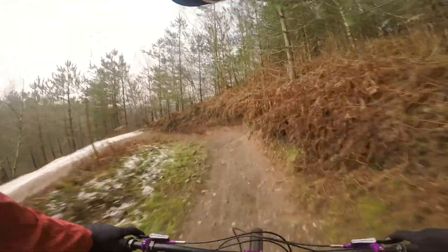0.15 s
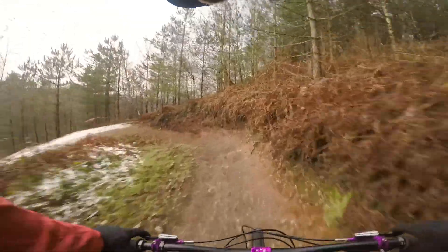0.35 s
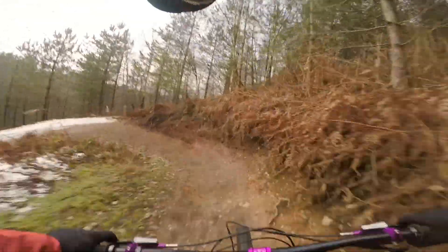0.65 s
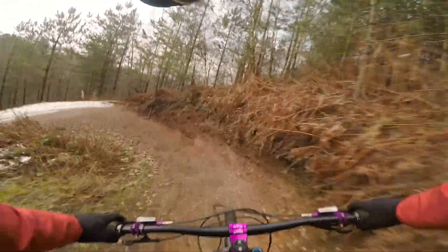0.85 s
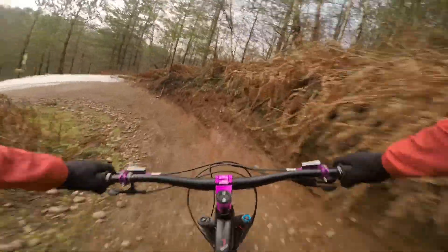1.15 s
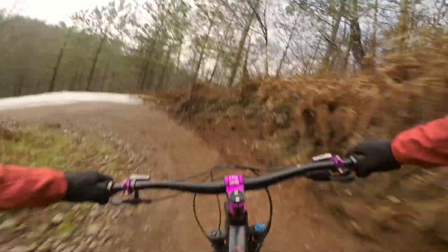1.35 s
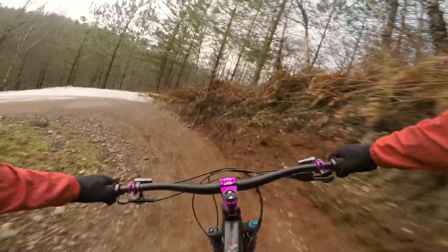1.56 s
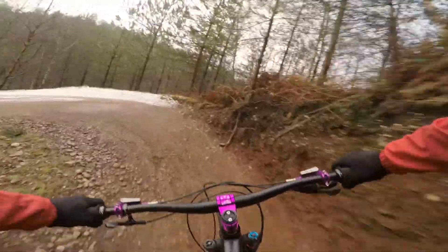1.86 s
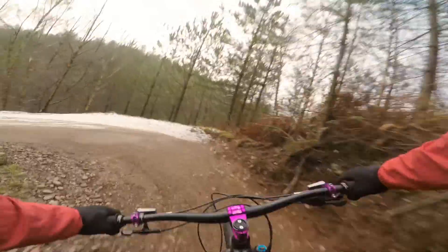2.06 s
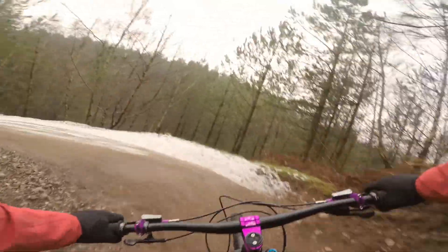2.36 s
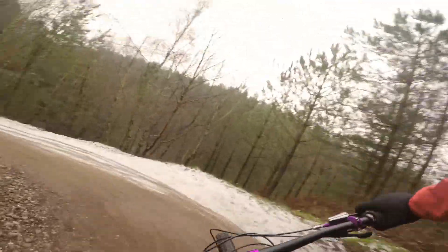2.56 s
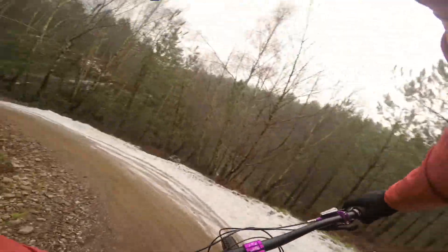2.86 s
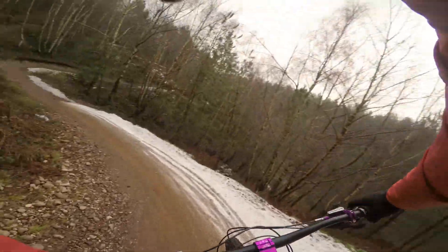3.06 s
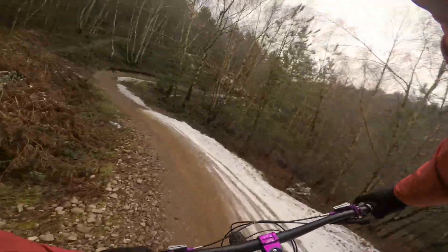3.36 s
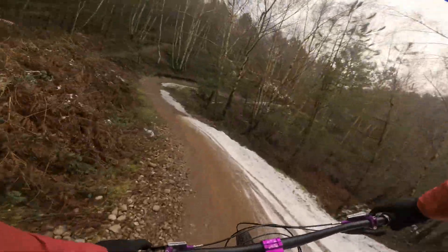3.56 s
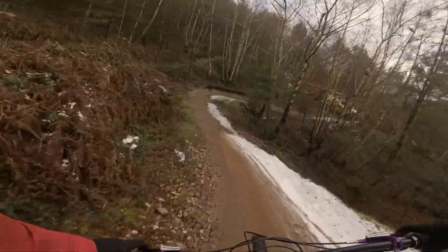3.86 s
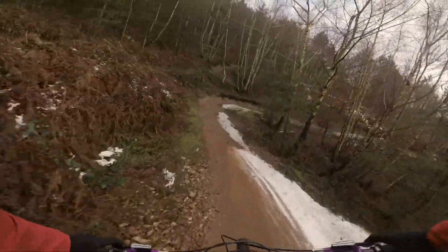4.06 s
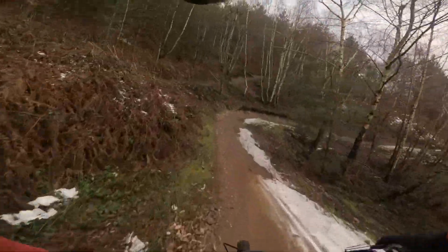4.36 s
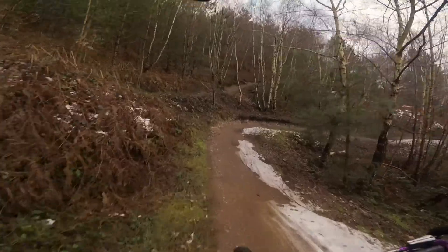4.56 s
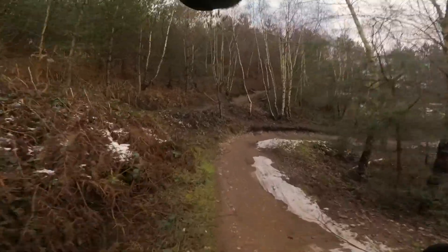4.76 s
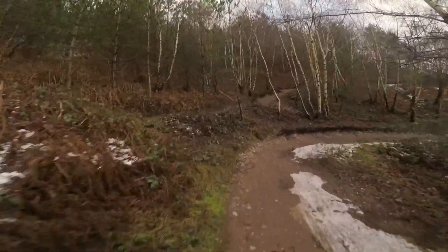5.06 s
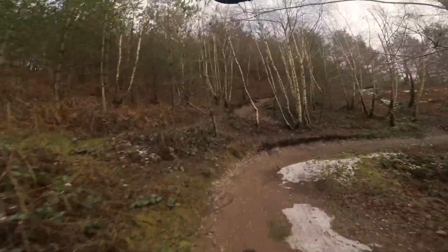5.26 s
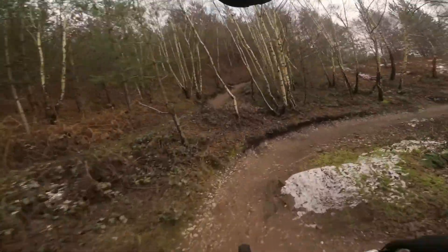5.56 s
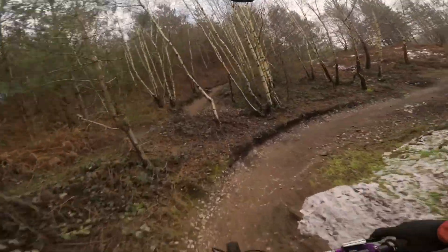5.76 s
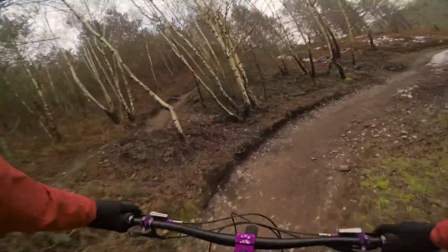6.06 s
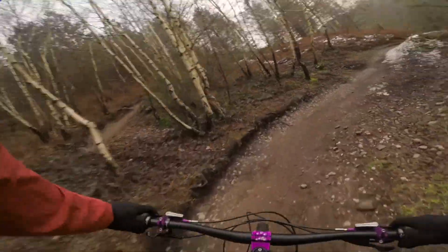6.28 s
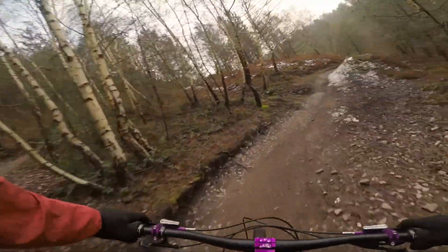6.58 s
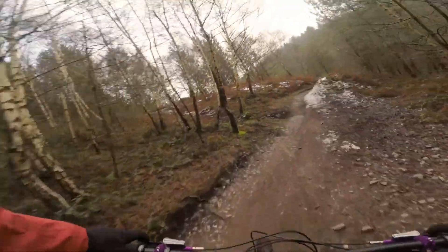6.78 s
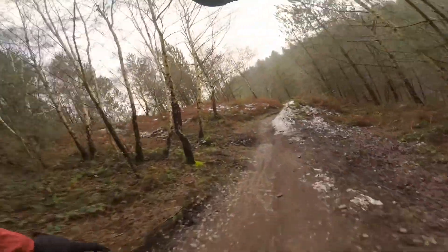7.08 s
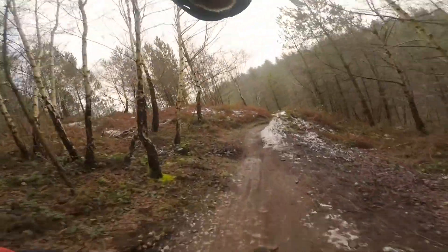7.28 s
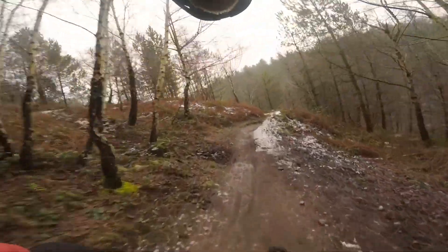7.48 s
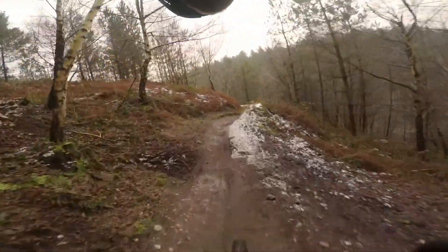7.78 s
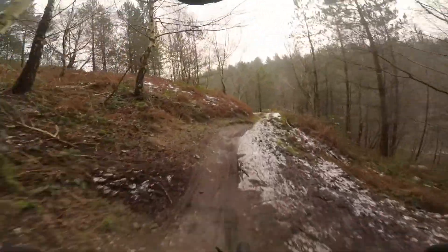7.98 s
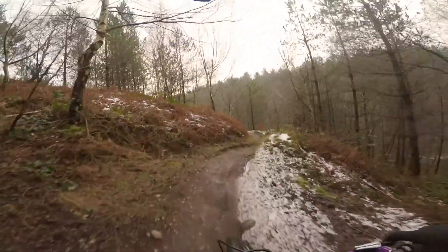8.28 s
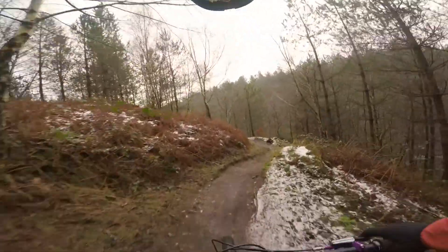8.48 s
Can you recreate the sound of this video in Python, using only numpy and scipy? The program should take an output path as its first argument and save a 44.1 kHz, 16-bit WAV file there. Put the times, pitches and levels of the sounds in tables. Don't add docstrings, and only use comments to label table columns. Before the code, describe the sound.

Close plastic knocks and tyre crackle over gravel, a quieter smooth stretch with rapid heartbeat and low wind rumble, then renewed clatter on rough trail.

```python
import sys
import numpy as np
from scipy import signal
from scipy.fft import rfft, irfft
from scipy.io import wavfile
from scipy.ndimage import uniform_filter1d

SR = 44100
rng = np.random.default_rng(int(sys.argv[2]) if len(sys.argv) > 2 else 0)


def wav_record(signal):
    frames = np.transpose(np.atleast_2d(signal))
    bounded = np.clip(frames, -1, 1)
    quanta = np.round(bounded * 32767).astype(np.int16)
    wavfile.write(sys.argv[1], SR, quanta)


def undo_db(level):
    steps = np.asarray(level, float) / 20
    return 10 ** steps


N = 380583
HZ = np.fft.rfftfreq(N, 1 / SR)
T = np.arange(N) / SR


def evened(x):
    return x / np.sqrt(np.mean(x ** 2) + 1e-20)


def read(points):
    hz, value = np.transpose(points)
    return np.interp(np.log(HZ + 1), np.log(hz + 1), value)


def curve(rows, order):
    rows = np.vstack(rows)
    return np.interp(T, rows[:, 0], rows[:, order])


def colour(x, points):
    return evened(irfft(rfft(x) * undo_db(read(points)), N))


def lumps(top_hz):
    shape = HZ / (HZ + 5) / (1 + (HZ / top_hz) ** 2) / np.sqrt(HZ + 1)
    return evened(irfft(rfft(rng.standard_normal(N)) * shape, N))


def grains(per_s, spread_db):
    size = undo_db(spread_db * np.minimum(rng.exponential(1, N), 4)) * rng.choice([-1., 1.], N)
    return evened(size * (rng.random(N) < per_s / SR))


def blip(t, hz, length):
    return np.exp(-(t / length) ** 2) * np.sin(2 * np.pi * hz * t)


def add(mix, s, sound):
    part = mix[max(round(s * SR), 0):][:len(sound)]
    part += sound[:len(part)]


# (frequency [Hz], share of mid taken off the side [ratio])
LEAN = [(60, 0.042), (300, 0.2), (700, 0.35), (1300, -0.12), (5000, -0.099), (9000, 0.17)]


def ports(mid, other, side_db, alike):
    spectrum = rfft(mid)
    side = undo_db(read(side_db)) * (1j * alike * spectrum + np.sqrt(1 - alike ** 2) * rfft(other))
    side = irfft(side - read(LEAN) * spectrum, N)
    return np.array([mid + side, mid - side])


# (time [s], level [dB])
TRAIL = [(0.0, 13), (0.09, -1), (0.56, 7), (1.34, 3.5), (1.9, 3.5), (2.39, 9.5), (2.56, 7), (2.6, -1.5),
         (2.89, -10), (3.47, -1.5), (4.29, -4), (5.16, 7), (5.4, 1), (6.55, 5), (6.9, -0.5), (7.68, 2),
         (7.93, 2), (8.63, 1)]


def stoniness():
    smooth_db, span_db = -4.5, 8.5
    return np.clip((curve(TRAIL, order=1) - smooth_db) / span_db, .05, 1)


# (time [s], peak level [dB], thud
# against click [dB])
KNOCKS = [(0.0172, -8, -9), (0.185, -15.5, -9), (0.2229, -17, 0.5), (0.4226, -23, 9), (0.4534, -12.5, -28),
          (0.4982, -14, -18), (0.597, -8.5, -31), (0.6809, -12.5, -30), (0.7144, -19, -17),
          (0.85, -13, -26), (1.0268, -14, -3), (1.0805, -13.5, -0.5), (1.131, -17, 1), (1.1936, -19, -1),
          (0.2922, -17.5, -19), (1.4669, -10, -3), (1.499, -12, -2), (1.6115, -15, -7), (1.7434, -16, 2),
          (1.8089, -9, -2), (1.8502, -13, -5), (1.9594, -10, -36), (2.0068, -11, -2), (2.1794, -15, -1),
          (2.2223, -19, 0), (2.4099, -8.5, 2.5), (2.4768, -28, 5), (2.544, -19, -14), (2.5888, -17.5, -4),
          (3.831, -18.5, 2), (4.7285, -18, -23), (4.911, -22.5, -18), (4.9884, -13.5, -37),
               (5.028, -22.5, 8), (5.176, -13, -0.5), (5.3221, -13, -26), (5.4306, -14.5, -6.5),
               (5.5782, -13.5, 2), (5.6492, -9.5, -16), (5.722, -18, -26), (5.7962, -13.5, -2.5),
               (5.935, -16, -0.5), (6.0481, -16, -24), (6.164, -11, 0.5), (6.285, -5.5, -8),
               (6.5163, -8, -5.5), (6.6137, -7, -10), (6.8447, -16, -1), (6.8637, -11.5, -6),
               (7.5011, -15.5, -4), (7.5133, -13, -32), (7.582, -15.5, -14), (7.6753, -26, 8),
               (7.73, -14.5, -6), (7.7727, -14, -8), (8.021, -18, -8), (8.1874, -20.5, -1),
               (8.3918, -11, -6), (8.4002, -11, -7)]
# (time [s], peak level [dB], swing time [ms], second blow against first [dB], thud against click [dB])
DOUBLES = [(0.532, -11.5, 22.8, -0.5, -4.5), (0.7368, -9, 23.6, -2.5, -3), (0.92, -13, 26, 5, -4),
           (1.0352, -11, 6.3, 1, -10), (1.2186, -6, 23, -12, -4.5), (1.3346, -5, 27, -8, -4),
           (1.9095, -14, 25, 2.5, -11), (2.0685, -12, 26.7, -0.5, 1), (2.3078, -14, 23.3, 2, -9),
           (3.796, -21.5, 24, -5, -41), (3.981, -22.5, 22, 1.5, -3), (4.522, -27.5, 20, -1, 5),
           (5.077, -10, 23.6, -2.5, -5), (5.2129, -16.5, 27, -2, -6), (6.185, -11, 23, 3.5, -10),
           (6.313, -10.5, 24.5, -1, -11), (6.381, -16.5, 23.6, 5, -3), (6.4495, -9, 22.5, -6, -2),
           (7.8921, -22.5, 27, 4, -11), (7.958, -9, 22.5, 1.5, -4), (8.139, -13.5, 24, -2.5, -3),
           (8.308, -16.5, 25, -1.5, -9), (1.407, -12.5, 11.3, -3.5, 7.5)]


def all_knocks():
    first = [(s, db, thud_db) for s, db, ms, again_db, thud_db in DOUBLES]
    second = [(s + ms / 1000, db + again_db, thud_db) for s, db, ms, again_db, thud_db in DOUBLES]
    return KNOCKS + first + second


# (frequency [Hz], level per Hz [dB])
CLICK = [(500, 8), (1000, 8), (1300, 12), (1750, -6), (2250, 18), (2750, -24), (4200, 2), (6000, -30),
         (12000, -83)]


def knocking():
    out, blows, t = np.zeros(N), np.zeros(N), np.arange(1800) / SR
    rise_s, thud_t60_s, rustle_t60_s = .002, .028, .018
    knocks = all_knocks()
    chances = rng.random((len(knocks), 5))
    noises = rng.standard_normal((len(knocks), 1800))
    for (s, db, thud_db), (a, b, c, d, e), noise in zip(knocks, chances, noises):
        contact = blip(t - .0012, hz=1318 - 44 * thud_db + 300 * e, length=0.00044)
        bounce = undo_db(-6.0 - 10 * a) * blip(t - .003 - 0.00229 * c, hz=1250 + 900 * d, length=0.0011)
        bounce += undo_db(-15.5 - 9.3 * b) * blip(t - .0075 - 0.00428 * a, hz=1300 + 700 * c, length=0.0015)
        slack = undo_db(db - 11.0 - 13.0 * c) * blip(t - .002, hz=900 + 900 * a, length=0.0011)
        add(out, s - .003 - 0.0028 * d, slack)
        push = np.sin(np.pi * np.minimum(t / rise_s, .5)) * undo_db(-60 * t / thud_t60_s)
        thud = push * np.sin(2 * np.pi * ((220 + 400 * b) * t + d))
        shove = undo_db(-1.5) * blip(t - .008, hz=140 + 130 * a, length=0.0036)
        add(out, s, undo_db(db + 2.5) * (contact + bounce) + undo_db(db + thud_db - 3.5) * (thud + shove))
        add(blows, s, np.minimum(t / 0.0042, 1) * undo_db(db - 60 * t / rustle_t60_s) * noise)
    return out + undo_db(-4.0) * irfft(rfft(blows) * undo_db(read(CLICK)), N)


# (frequency [Hz], level per Hz [dB])
RATTLE = [(240, -25), (400, 3.5), (549, 6.5), (1000, -10), (1250, 2), (1760, 1), (2650, 1), (2920, -12),
          (5000, -11.5), (6500, -45), (11000, -120)]
# (frequency [Hz], side minus mid [dB])
SIDE_CASE = [(60, -14), (110, -18), (200, -4), (370, -31), (690, 8), (1260, 0.5), (2320, -6.5), (4260, -15),
             (7840, 35), (14400, 3)]


def mount(bumps):
    knocks = knocking()
    shaking = undo_db(curve(TRAIL, order=1) - 38.5 + (0.9 + 2.8 * stoniness()) * bumps)
    tick = blip(np.arange(1800) / SR - .002, hz=1620, length=0.00098)
    ticks = evened(signal.oaconvolve(grains(per_s=200, spread_db=6.5), tick)[:N])
    ticks = ticks * stoniness()
    near, far = (shaking * (0.36 * ticks + 0.82 * colour(a, RATTLE)) for a in rng.standard_normal((2, N)))
    smear = rng.standard_normal((3, 400)) * np.exp(-np.arange(400) / 106.0)
    smear = smear / np.linalg.norm(smear[0])
    share = np.cos(2 * np.pi * (lumps(top_hz=8.1) + np.arange(3)[:, None] / 3)) * np.sqrt(2 / 3)
    other = signal.oaconvolve((knocks + far) * share, smear, axes=1).sum(0)[:N]
    return ports(knocks + near, 1.85 * other, SIDE_CASE, alike=0.38)


# (time [s], peak level [dB], ring [Hz])
TICKS = [(0.1037, -21, 1720), (0.327, -24, 3100), (0.344, -23, 1390), (0.3827, -22, 1640),
         (0.4373, -16, 1900), (0.5052, -17, 2000), (0.5226, -19, 2400), (0.5722, -25, 1500),
         (0.5819, -20, 1500), (0.6047, -8.5, 2280), (0.655, -20, 1670), (0.6964, -18, 2400),
         (0.7294, -13, 2190), (0.7944, -15, 1560), (0.8592, -13, 1600), (0.8862, -13, 2390),
         (1.0595, -16, 1700), (1.0984, -19, 2620), (1.117, -18, 1820), (1.144, -15, 1350),
         (1.293, -14, 1390), (1.3093, -16, 1310), (1.4596, -17, 1270), (1.513, -16, 2160),
         (1.5698, -20.5, 3410), (1.6237, -16, 1660), (1.672, -26, 3100), (1.7075, -18, 1410),
         (1.823, -11, 1860), (1.8857, -19, 2000), (2.0194, -25, 1940), (2.1019, -21, 1500),
         (2.1097, -15, 1600), (2.1695, -30, 1700), (2.1947, -18, 1700), (2.232, -15, 1900),
         (2.3467, -9, 1560), (2.3563, -23, 2540), (2.389, -14, 2310), (2.4605, -18, 2500),
         (2.487, -16, 1640), (2.5574, -18, 2220), (8.403, -13, 1900), (8.4138, -13, 1950),
         (8.317, -20, 2400)]
# (time [s], peak level [dB], ring [Hz])
TICKS_LATE = [(3.1143, -26, 2830), (3.274, -24, 2800), (3.7592, -25, 2240), (4.024, -17, 1500),
              (4.6606, -20.5, 2180), (4.8786, -19.5, 2920), (4.9177, -16.5, 2400), (4.9344, -18.5, 3270),
              (4.96, -22, 2770), (5.035, -17, 1700), (5.192, -20, 1900), (5.2653, -17, 1780),
              (5.3627, -20, 1630), (5.3898, -18, 1630), (5.4687, -24, 2920), (5.5738, -10.5, 1600),
              (5.6215, -21, 1610), (5.733, -20, 1690), (5.8197, -16, 1600), (5.8551, -22.5, 1520),
              (5.907, -24, 2920), (5.9594, -24, 1640), (6.2153, -18, 1600), (6.0806, -22, 1620),
              (6.13, -17.5, 2450), (6.2457, -19, 1720), (6.48, -14.5, 1460), (6.554, -15, 1750),
              (6.305, -27, 1600), (6.6465, -16, 1500), (6.6664, -17, 1330), (6.73, -22, 1600),
              (6.901, -16, 1260), (7.0284, -23, 1550), (7.2184, -14, 1600), (7.1367, -21, 2310),
              (7.176, -23, 3300), (7.198, -16, 1630), (7.9471, -18, 1500), (7.4112, -20, 1650),
              (7.6452, -17, 1550), (7.701, -26, 1400), (7.835, -21, 1450), (7.8523, -21, 3300),
              (8.009, -26, 1220), (8.0676, -28, 2140), (8.103, -24, 1310), (8.125, -22, 2160),
              (8.2055, -18.5, 1690), (8.2295, -29, 1500), (8.3857, -18, 1900), (8.4244, -19, 1360),
              (8.4755, -26, 2000), (8.506, -26, 2760), (8.5922, -19, 2800)]
# (time [s], peak level [dB], pitch [Hz])
THUMPS = [(0.183, -15, 172), (1.049, -20, 208), (1.193, -9, 156), (1.22, -13, 175), (1.266, -6.5, 136),
          (1.332, -4, 185), (1.418, -5, 162), (1.465, -10, 184), (1.536, -7.5, 137), (1.699, -18, 143),
          (1.811, -12, 186), (2.016, -3.5, 230), (2.05, -14, 143), (2.065, -4.5, 201), (2.109, -33, 183),
          (2.189, -10.5, 197), (2.233, -9.5, 139), (2.304, -7.5, 212), (2.349, -23, 190), (2.48, -13, 366),
          (2.542, -11.5, 398), (2.585, -12, 201), (3.782, -28, 156), (3.824, -29, 164), (4.44, -22, 210),
          (4.496, -18, 185), (4.543, -15, 178), (4.622, -15.5, 144), (4.798, -13.5, 170),
          (4.898, -11.5, 193), (5.021, -13.5, 194), (5.096, -12, 152), (5.174, -13, 155), (5.219, -24, 269),
          (5.428, -17.5, 150), (5.521, -14, 200), (5.571, -21, 142), (5.793, -9, 222), (5.96, -9, 166),
          (6.156, -32, 143), (6.212, -9, 151), (6.444, -10.5, 240), (7.743, -18, 260), (7.955, -11, 162),
          (8.393, -12, 161),
          (1.424, -8, 164),
    (2.426, -25, 180),
    (2.499, -9, 490),
    (5.133, -19, 232),
    (5.264, -15, 258),
    (5.647, -14.5, 404),
    (5.809, -12, 161),
    (5.83, -11, 192),
    (5.906, -19, 161),
]


def taps():
    out, t, rows = np.zeros(N), np.arange(1800) / SR, TICKS + TICKS_LATE
    for (s, db, hz), (a, b, c) in zip(rows, rng.random((len(rows), 3))):
        tick = blip(t - .0015, hz, length=0.0012)
        tick += undo_db(-1.0) * blip(t - .0015, hz=2900 + 600 * a, length=0.00034)
        echo = undo_db(-6 - 8.4 * b) * blip(t - .0015 - 0.0064 * (1 + c), hz=1300 + 500 * a, length=0.0018)
        body = undo_db(-0.5) * blip(t - .002, hz=724, length=0.00046)
        add(out, s - .0005, undo_db(db - 4.0) * (tick + echo + body))
    for s, db, hz in THUMPS:
        length = 0.604 / hz
        late = t - 2 * length
        thump = blip(late, hz, length) + undo_db(-17) * blip(late, 2.46 * hz, length)
        add(out, s - .002, undo_db(db - 1.0) * thump)
    smear = rng.standard_normal(400) * np.exp(-np.arange(400) / 99.0)
    other = signal.oaconvolve(out, smear / np.linalg.norm(smear))[:N]
    return ports(out, other, SIDE_CASE, alike=0.39)


def jolts():
    shaken, t = np.zeros(N), np.arange(4400) / SR
    rise_s, t60_s, rest_db, share = .005, .05, -38, 0.57
    for s, db, _ in all_knocks() + TICKS + TICKS_LATE:
        add(shaken, s - rise_s, np.minimum(t / rise_s, 1) * undo_db(db - 60 * t / t60_s))
    level_db = 20 * np.log10(shaken + undo_db(rest_db))
    blows = evened(level_db - uniform_filter1d(level_db, size=13000))
    return share * blows + np.sqrt(1 - share ** 2) * lumps(top_hz=35.3)


# (time [s], grit under the tread [dB], wetness [dB])
TREAD = [(0.0, -3.5, 3.5), (0.56, 2, 1.5), (1.34, 2, -4), (1.9, 1.5, 2), (2.56, 5.5, -2.5),
         (2.6, -1.5, -0.5), (2.89, -1.5, 1.5), (4.4, 4.5, 1.5), (4.55, 0, 2), (5.18, -2.5, 4.5),
         (5.4, 0.5, -0.5), (6.55, 1, 0.5), (6.94, -1, 4), (7.9, -2.5, -0.5), (8.0, -7, -4.5),
         (8.19, -5.5, 6), (8.24, 3.5, -8), (8.63, 1.5, -1.5)]
# (frequency [Hz], level per Hz [dB])
HISS = [(2120, -39), (3600, -12.5), (4130, -7.5), (5020, -5.5), (5890, 0), (7430, 2.5), (8660, -8),
        (12600, -20), (14300, -26), (14900, -55)]
# (frequency [Hz], width [Hz], level [dB])
WHIRR_HZ = [(1560, 370, -3), (2254, 134, -7), (3058, 1220, 1)]
# (frequency [Hz], side minus mid [dB])
SIDE_AIR = [(60, -17), (110, -6.5), (200, -9), (370, -1), (690, -9), (1260, 0), (2320, -8.5), (4260, -9.5),
            (7840, -1.5), (14400, 0.5)]


def tyres(bumps):
    grit_db, wet_db, stony = curve(TREAD, order=1), curve(TREAD, order=2), stoniness()
    cavities = [undo_db(db) / (1 + (2 * (HZ - hz) / width) ** 2) for hz, width, db in WHIRR_HZ]
    lifts = undo_db(np.outer(np.arange(len(cavities)) - 1, 0.26 * grit_db))
    fizz = undo_db(grit_db - 37.5 + 1.18 * lumps(top_hz=59.7) + 0.7 * bumps)
    flutter_db = (1.67 + 2.0 * stony) * (1.12 * lumps(top_hz=55.6) + 0.2 * bumps)
    whirr = undo_db(grit_db + wet_db - 39.5 + flutter_db)

    def roll():
        grit = grains(per_s=2000, spread_db=7.5)
        air, hum = rng.standard_normal((2, N))
        rings = irfft(rfft(0.3 * stony * grit + hum) * cavities, N)
        return fizz * colour(.5 * grit + air, HISS) + whirr * evened((lifts * rings).sum(0))

    return ports(roll(), roll(), SIDE_AIR, alike=0.24)


# (time [s], level [dB], length [s])
SLIDES = [(1.235, -25, 0.044), (1.37, -31, 0.05), (1.752, -26, 0.072), (1.963, -19.5, 0.017),
          (1.98, -27, 0.076), (2.169, -18.5, 0.026), (2.23, -24, 0.024), (2.384, -25, 0.037),
          (2.47, -18, 0.033), (2.528, -23.5, 0.037), (7.509, -28, 0.025), (8.352, -34, 0.046)]
# (frequency [Hz], level per Hz [dB])
SPRAY = [(300, -29), (500, -5.5), (754, -2), (862, -12), (2000, -4), (2750, -0.5), (3500, -9),
         (4940, -12.5), (7300, -5), (8230, -15), (13900, -37), (14900, -61)]


def gravel():
    level = sum(undo_db(db) / (1 + (2 * (T - s) / length - 1) ** 6) for s, db, length in SLIDES)
    mid, other = (level * colour(grains(per_s=2200, spread_db=0.5), SPRAY) for _ in range(2))
    return ports(mid, other, SIDE_AIR, alike=0.48)


# (time of the middle [s], pitch [Hz], level [dB], length [s])
SQUEAKS = [(2.042, 12050, -38, 0.0074), (2.07, 10120, -30, .012), (2.07, 13800, -48, .012),
           (2.097, 12100, -41, .014), (2.128, 10200, -32, .012), (2.125, 13800, -47, .014),
           (2.152, 12100, -42, .008), (2.407, 10150, -30, 0.0058), (2.407, 13850, -50, .008),
           (2.49, 13700, -48, .014), (2.53, 13000, -51, .012), (2.535, 12100, -56, .02),
           (2.575, 10050, -25.5, 0.01), (2.575, 13950, -47, .014), (8.291, 2980, -29, 0.008)]


def brake():
    out, t = np.zeros(N), np.arange(-1300, 1300) / SR
    for (s, hz, db, length), wobble in zip(SQUEAKS, rng.standard_normal((len(SQUEAKS), len(t)))):
        turns = np.cumsum(hz * (1 + .09 * uniform_filter1d(wobble, size=60))) / SR
        add(out, s + t[0], undo_db(db) * np.exp(-(t / length) ** 2) * np.sin(2 * np.pi * turns))
    return np.array([out * undo_db(5.5), out * undo_db(-4.0)])


# (time of the sharp beat [s], level [dB], slow swing level [dB])
BEATS = [(0.098, -11, -25), (0.421, -17, -28), (0.746, -22, -8), (1.065, -9, -24), (1.402, -12, -9),
         (1.718, -23, -25), (2.039, -18, -40), (2.372, -31, -26), (2.69, -25, -19), (2.996, -9.5, -13),
         (3.33, -13, -10), (3.659, -15, -7.5), (3.986, -8.5, -9.5), (4.301, -11.5, -12.5),
         (4.639, -17, -34), (4.972, -17, -18), (5.298, -12, -6.5), (5.613, -17, -2.5), (5.942, -21, -5),
         (6.274, -14, -48), (6.603, -13, -34), (6.917, -11.5, -9), (7.248, -13, -7), (7.568, -9.5, -16),
         (7.892, -6.5, -6), (8.228, -6.5, -9), (8.547, -12, -6.5)]


def heart():
    out, t = np.zeros(N), np.arange(-2200, 4400) / SR
    for (s, knock_db, swing_db), (a, b) in zip(BEATS, rng.uniform(0.7, 0.85, (len(BEATS), 2))):
        fall = np.cos(2 * np.pi * (98 * a * t - 1100 * b * t ** 2))
        knock = undo_db(knock_db) * np.exp(-(t / 0.0096) ** 2) * fall
        knock += undo_db(knock_db - 5.5) * blip(t + 0.016 * (a - b) + .006, hz=150 * b, length=0.0091)
        late = t - .022
        swing = undo_db(swing_db - 2.0) * np.exp(-(late / 0.027) ** 2) * np.cos(2 * np.pi * 40 * b * late)
        add(out, s + t[0], knock + swing)
    return out * undo_db([[-.5], [.5]])


def tugs():
    out, t = np.zeros(N), np.arange(-4400, 4400) / SR
    pulls = [(s, db + thud_db - 19) for s, db, thud_db in all_knocks()]
    pulls += [(s, db - 31) for s, db, _ in BEATS]
    for s, db in pulls:
        start = s + t[0]
        heard = t[max(round(-start * SR), 0):]
        add(out, max(start, 0), undo_db(db) * np.exp(-(heard / 0.026) ** 2))
    return out


# (time [s], level [dB])
SHAKE = [(0.0, 2), (0.89, 4), (1.42, 1), (1.58, 6.5), (2.5, 1), (2.74, -0.5), (2.93, -13.5), (3.46, -8.5),
         (4.42, -7), (5.19, 3), (5.6, -6.5), (5.77, 1.5), (6.22, 2), (7.09, -6), (7.33, -2.5), (7.64, 2),
         (8.36, -4.5), (8.63, 4)]
# (frequency [Hz], level per Hz [dB])
RUMBLE = [(7.1, 1.5), (12, 12), (29, 7.5), (54, -4), (130, -28), (170, -17), (290, -120)]
# (frequency [Hz], level per Hz [dB])
BUFFET = [(53, 0.5), (90, -1), (234, -6), (334, -12), (510, -20), (690, -21.5), (1200, -27), (1560, -22),
          (2640, -120)]


def wind(bumps):
    jerks, shake_db = lumps(top_hz=7.0), curve(SHAKE, order=1)
    sway = undo_db(shake_db - 17 + 2.0 * jerks)
    flow = undo_db(-31.5 + 0.048 * shake_db + 0.92 * curve(TRAIL, order=1))
    gusts = (flow + tugs()) * undo_db((1.5 + 1.32 * stoniness()) * bumps + 0.91 * jerks)
    noises = rng.standard_normal((2, 2, N))
    mid, other = (sway * colour(a, RUMBLE) + gusts * colour(b, BUFFET) for a, b in noises)
    return ports(mid, other, SIDE_AIR, alike=0.33)


def scene():
    bumps = jolts()
    return mount(bumps) + taps() + tyres(bumps) + gravel() + brake() + heart() + wind(bumps)


def low_pass(x):
    return signal.sosfilt(signal.butter(12, 15020, fs=SR, output="sos"), x)


def record(dry):
    mix = 0.93 * np.tanh(dry / 1.12)
    return low_pass(mix)


dry = scene()
out = record(dry)
wav_record(out)
```